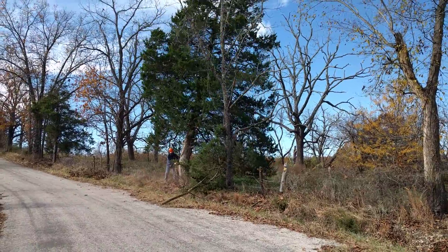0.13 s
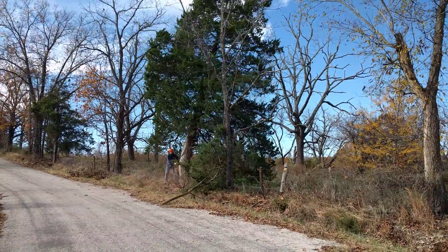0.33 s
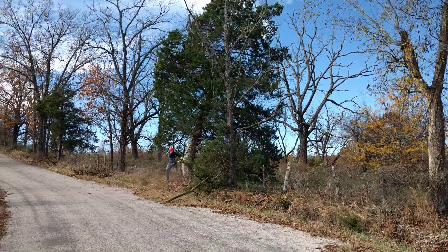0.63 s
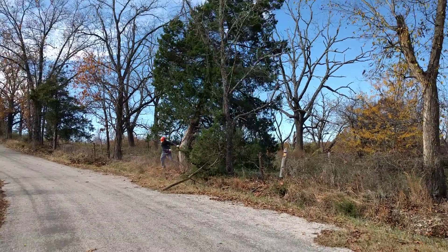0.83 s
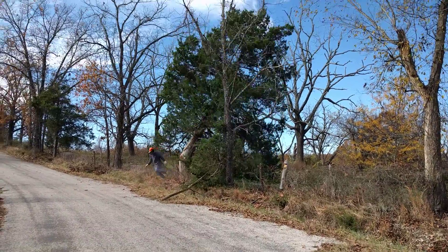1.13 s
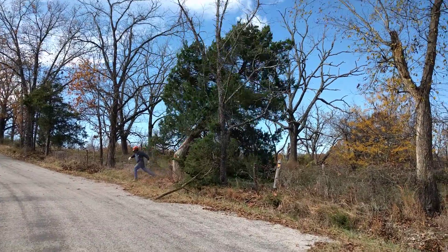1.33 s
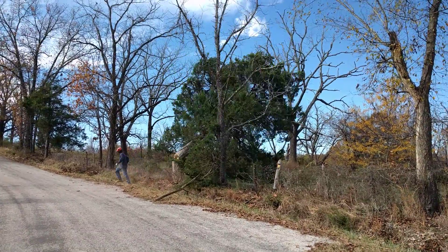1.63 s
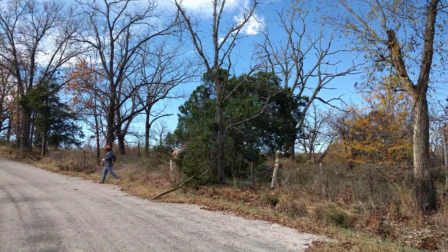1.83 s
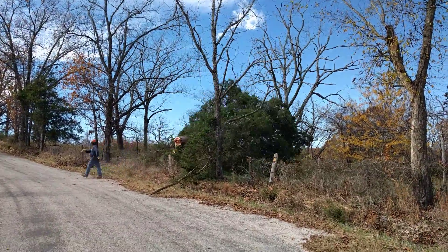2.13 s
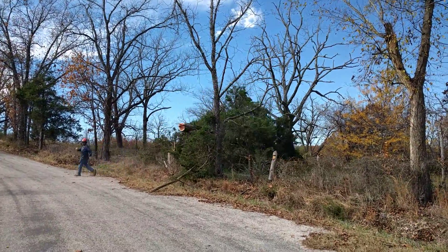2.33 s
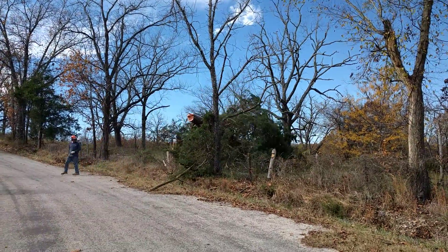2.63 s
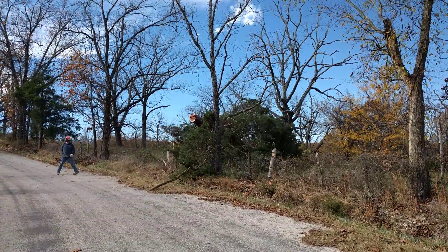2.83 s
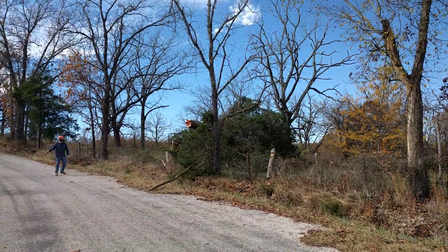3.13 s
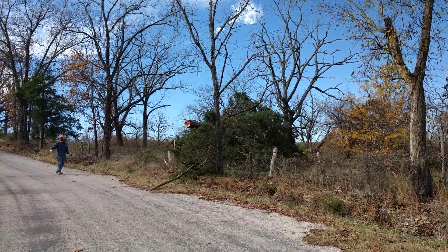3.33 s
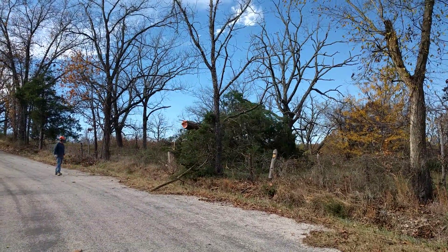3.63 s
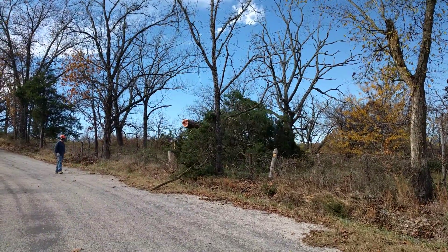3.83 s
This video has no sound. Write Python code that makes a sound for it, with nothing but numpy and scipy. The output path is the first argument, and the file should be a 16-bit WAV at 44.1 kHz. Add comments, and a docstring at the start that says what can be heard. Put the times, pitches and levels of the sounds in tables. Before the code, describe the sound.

A tree falls outdoors: a buzzing chainsaw runs down as loud cracks burst out, the hinge creaks and groans, then branches swish and snap, dull thuds follow, and a faint idle putters; microphone at some distance.

```python
"""Felling an evergreen

A chainsaw runs down to idle: exhaust pulses through a muffler. Hinge wood cracks (noise bursts),
creaks (jerky slips ringing fibres) and groans (regular slips through resonances).
Foliage swishes (noise), twigs snap, limbs thud (decaying sines) over a rumble.
The surrounding woods answer with scattered echoes, in faint outdoor air."""
import sys
import numpy as np
from scipy import signal
from scipy.fft import rfft, irfft, next_fast_len
from scipy.io import wavfile

SR = 44100
rng = np.random.default_rng(int(sys.argv[2]) if len(sys.argv) > 2 else 0)


def wrap_up_sound(samples):
    """Save the sound to the file named by the first command line argument, as 16-bit audio."""
    columns = np.atleast_2d(samples).T
    # keep every value between -1 and 1, then stretch to whole-number steps
    tamed = np.clip(columns, -1, 1)
    steps = np.round(tamed * 32767).astype(np.int16)
    wavfile.write(sys.argv[1], SR, steps)


N = 176400  # samples


def amp(db):
    """Decibels to gain."""
    return 10 ** (np.asarray(db) / 20)


def unit(x):
    """Scale to rms 1."""
    return x / np.sqrt(np.mean(x ** 2) + 1e-20)


def along(points, hz):
    """Read (frequency [Hz], value) points on a log-frequency axis."""
    f, v = np.transpose(points)
    return np.interp(np.log(hz + 1), np.log(f + 1), v)


def curves(rows):
    """One value per sample for each column after the time."""
    s, *cols = np.transpose(rows)
    return [np.interp(np.arange(N) / SR, s, c) for c in cols]


def fade(t, t60_s):
    """Exponential decay, 60 dB in t60_s."""
    return np.exp(-np.log(1000) * t / t60_s)


def attack(t, rise_s):
    """Exponential onset with time constant rise_s."""
    return 1 - np.exp(-t / rise_s)


def add(track, s, sound):
    """Mix a sound into a track at time s."""
    part = track[max(round(s * SR), 0):][:len(sound)]
    part += sound[:len(part)]


def body(x, points):
    """Filter x by a minimum-phase body: relative response from the points, impulse energy 1."""
    size = 8192
    log_gain = np.log(amp(along(points, np.fft.rfftfreq(size, 1 / SR))))
    # folding the cepstrum makes the response causal
    cepstrum = irfft(log_gain)
    cepstrum[1:size // 2] *= 2
    cepstrum[size // 2 + 1:] = 0
    ring = irfft(np.exp(rfft(cepstrum)))
    return signal.fftconvolve(x, ring / np.linalg.norm(ring))[:N]


def noise(points):
    """Coloured noise of rms 1."""
    return unit(body(rng.standard_normal(N), points))


def beats(rows, jitter_s, scatter_db):
    """Times and strengths of a train at the rate in the second column, lasting as long as the rows."""
    rate, t = curves(rows)[0], np.arange(N) / SR
    turns = np.cumsum(rate) / SR
    when = np.interp(np.arange(1, turns[-1]), turns, t)
    when = when[(when > rows[0][0]) & (when < rows[-1][0])]
    chance = rng.standard_normal((len(when), 2))
    strength = unit(amp(scatter_db * chance[:, 0]))
    # sparser pulses are stronger, so the train stays near rms 1
    strength = strength * np.sqrt(SR / np.interp(when, t, rate))
    return when + jitter_s * chance[:, 1], strength


def pulses(rows, jitter_s, scatter_db):
    """A sharp pulse on every beat, about rms 1, placed between samples by a windowed sinc."""
    when, strength = beats(rows, jitter_s, scatter_db)
    at = when[:, None] * SR
    taps = np.floor(at).astype(int) + np.arange(-7, 9)
    shape = np.sinc(taps - at) * np.cos(np.pi * (taps - at) / 16) ** 2
    weights = strength[:, None] * shape
    return np.bincount(np.clip(taps, 0, N).ravel(), weights.ravel(), N + 1)[:N]


# radiation of breaking wood: (frequency [Hz], level [dB])
WOOD = [(40, -15), (150, 10.5), (400, 0.5), (600, 0), (2200, 4.5), (3100, -10), (4000, 1.5), (5300, -5),
        (6600, -21), (9500, -14.5), (15000, -44)]
CRACK_ATTACK_S, CRACK_OCTAVES = .0002, 0.78
CRACK_SKIRT_DB, CRACK_GRAIN_DB = -20.5, 5


def snap(centre_hz, t60_s, size):
    """One fracture: a fast-dying burst around the wood piece's pitch, with random resonances."""
    t, hz = np.arange(size) / SR, np.fft.rfftfreq(size, 1 / SR)
    octaves = np.log2((hz + 1) / centre_hz)
    knots = np.linspace(-5, 3, 48)
    grain = amp(CRACK_GRAIN_DB * np.interp(octaves, knots, rng.standard_normal(len(knots))))
    hump = np.exp(-.5 * (octaves / CRACK_OCTAVES) ** 2) + amp(CRACK_SKIRT_DB)
    colour = hump * amp(along(WOOD, hz)) * grain
    burst = unit(irfft(colour * np.exp(2j * np.pi * rng.random(len(hz)))))
    return burst * fade(t, t60_s) * attack(t, CRACK_ATTACK_S)


# breaking wood: (time [s], strength [dB], centre [Hz], t60 [s])
CRACKS = [(0.4671, -10, 2040, 0.023), (0.571, -15, 2150, 0.027), (.598, 1.5, 2000, 0.031),
          (0.64, -16, 2310, 0.017), (0.7495, -2.5, 1840, 0.029), (0.765, 0.5, 1530, 0.014),
          (0.827, -15.5, 1600, 0.058), (.833, 8.5, 1090, 0.027), (.876, -13.5, 1510, 0.014),
          (0.884, -10, 1450, 0.021), (0.9003, 2.5, 1765, 0.023), (0.9407, -7, 1390, .014),
          (.964, -4.5, 1400, 0.011), (1.162, -8, 3560, 0.012), (1.329, -12, 3770, 0.015),
          (1.394, -5.5, 3617, 0.011), (1.427, -14, 3740, 0.015), (1.584, -9.5, 2710, 0.04),
          (1.618, -17, 3420, 0.02), (1.652, -17, 2377, 0.029), (1.7371, -5.5, 2630, 0.03),
          (1.793, -3, 3465, 0.022), (1.81, -8.5, 3300, 0.024), (1.831, -4, 1360, 0.057),
          (1.886, -14.5, 2220, 0.096), (1.895, -10.5, 1960, 0.023), (1.9505, -12, 2860, 0.035),
          (2.002, -8, 2130, 0.018), (2.01, -11, 2430, 0.16), (2.038, -2, 3260, 0.016),
          (2.05, -10, 2440, 0.038), (2.081, -13, 3040, 0.023), (2.1086, -11.5, 2800, 0.016),
          (2.162, -17, 1860, 0.13), (2.189, -6, 1760, 0.041), (2.215, -13.5, 2260, 0.043),
          (2.2385, -3.5, 1750, 0.015), (2.249, -9, 1980, 0.11), (2.283, -13, 3000, 0.039),
          (2.332, -9, 2430, 0.043), (2.352, -14.5, 2600, 0.056), (2.425, -12, 2280, 0.032),
          (2.495, -23, 1810, 0.044), (2.548, -11.5, 1630, 0.023), (2.704, -11, 3520, 0.0046),
          (2.745, -18, 2560, 0.015), (2.848, -23, 2420, 0.069), (2.938, -24, 3020, 0.052),
          (3.096, -19, 2240, 0.027), (3.11, -24.5, 2160, .05), (3.128, -21, 3000, 0.044),
          (3.159, -25, 2120, 0.028), (3.314, -35.5, 2050, 0.032), (3.612, -49, 5930, 0.019)]
# sharp tick of each crack: (frequency [Hz], level [dB])
TICK = [(300, -18.5), (2000, 4), (4500, 14.5), (6500, -11), (10000, -13.5), (12000, -28), (16000, -21.5)]
TICK_DB, TICK_T60_S = -6, .0045
# heavy wood resounding as it breaks: (time [s], level [dB])
KNOCKS = [(0.603, -7), (0.767, -10.5), (0.836, 0), (0.904, -5), (1.831, -10), (1.894, -20), (2.187, -14.5),
          (2.251, -20), (2.355, -27.5), (2.529, -25), (2.546, -23.5)]
# resonance of the heavy wood: (frequency [Hz], level [dB])
TRUNK = [(50, -32.5), (110, -13), (230, 6), (380, -10), (540, 5.5), (850, 2.5), (1300, -12.5), (2500, -27),
         (8000, -59)]
KNOCK_T60_S, KNOCK_ATTACK_S = 0.056, .001


def cracks():
    """Hinge, then big branches, break: a sharp tick and a burst; heavy pieces also knock."""
    out, t = np.zeros(N), np.arange(8192) / SR
    ticks, trunk = noise(TICK), noise(TRUNK)
    for s, db, hz, t60_s in CRACKS:
        tick = ticks[round(s * SR):][:len(t)] * fade(t, TICK_T60_S)
        add(out, s, amp(db) * (snap(hz, t60_s, size=8192) + amp(TICK_DB) * tick))
    for s, db in KNOCKS:
        knock = trunk[round(s * SR):][:len(t)] * fade(t, KNOCK_T60_S) * attack(t, KNOCK_ATTACK_S)
        add(out, s, amp(db) * knock)
    return out


# hinge fibres popping one after another: (time [s], level [dB])
FIBRES = [(0, -38), (.4, -30), (.58, -23), (.7, -24), (.88, -24.5), (.95, -30), (1.1, -49)]
FIBRES_PER_S, FIBRE_HZ, FIBRE_T60_S, FIBRE_SCATTER_DB = 85, 1640, 0.022, 3.8  # Hz: median pitch


def fibres():
    """Strained fibres let go in an uneven run of small pops."""
    out = np.zeros(N)
    end_s = FIBRES[-1][0]
    for k, (late, pitch, size) in enumerate(rng.standard_normal((160, 3))):
        s = (k + .3 * late) / FIBRES_PER_S
        if s < end_s:
            pop = snap(FIBRE_HZ * np.exp(.15 * pitch), FIBRE_T60_S, size=1024)
            add(out, s, amp(FIBRE_SCATTER_DB * size) * pop)
    run = unit(out) * np.sqrt(end_s * SR / N)  # about rms 1 over the run alone
    return amp(curves(FIBRES)[0]) * run


# jerky hinge: (time [s], slips per second [1/s], level [dB], ring pitch [Hz])
CREAK = [(0.899, 127, -21, 1360), (.925, 140, -14.5, 1330), (.952, 140, -10.5, 1335), (.98, 185, -16, 1480),
         (1.02, 205, -15, 1480), (1.09, 210, -16.5, 1470), (1.15, 240, -18, 1450), (1.2, 285, -24.5, 1540),
         (1.25, 340, -34.5, 1560)]
# fibres rung by each jerk: (multiple of ring pitch [ratio], level [dB], t60 [s])
CREAK_MODES = [(.82, -4, .014), (1, 0, .016), (1.3, -2, .013), (2.75, -15, .008)]
# trunk radiation of the rings: (frequency [Hz], level [dB])
CREAK_BAND = [(300, -18.5), (800, -5), (1200, -1), (2050, -1.5), (2700, -11.5), (4200, -2.5), (6500, -25.5)]
# trunk shaken by the jerks: (frequency [Hz], level [dB])
CREAK_BASS = [(80, -22.5), (195, 7.5), (330, -21), (600, -12.5), (1500, -53)]
CREAK_BASS_DB = -12
CREAK_JITTER_S, CREAK_SCATTER_DB, CREAK_PITCH_SCATTER = .00028, 2.2, .06  # pitch: log ratio


def creak():
    """The hinge sticks and slips; each jerk rings fibres at a slightly new pitch and shakes the trunk."""
    _, level_db, ring_hz = curves(CREAK)
    rings, pushes, t = np.zeros(N), np.zeros(N), np.arange(1024) / SR
    ratio, db, t60_s = np.transpose(CREAK_MODES)[:, :, None]
    detune = np.exp(CREAK_PITCH_SCATTER * rng.standard_normal((128, len(ratio), 1)))
    for s, strength, shift in zip(*beats(CREAK, CREAK_JITTER_S, CREAK_SCATTER_DB), detune):
        hz = ring_hz[round(s * SR)] * ratio * shift
        modes = amp(db) * np.sin(2 * np.pi * hz * t) * fade(t, t60_s)
        ring = body(modes.sum(0), CREAK_BAND)
        add(rings, s, strength * ring / np.linalg.norm(ring))
        add(pushes, s, np.array([strength]))
    return amp(level_db) * (rings + amp(CREAK_BASS_DB) * body(pushes, CREAK_BASS))


# smooth hinge: (time [s], slips per second [1/s], bass level [dB], hollow middle level [dB],
# ring level [dB], bright edge level [dB])
GROAN = [(1.1, 150, -37, -41.5, -37, -36), (1.17, 142, -25, -22, -29, -30),
         (1.193, 175, -25, -29, -20, -18), (1.228, 172.6, -31.5, -24, -26.5, -24.5),
         (1.323, 193, -26.5, -26, -21, -23.5), (1.39, 195.5, -29.5, -30.5, -23, -26),
         (1.44, 199, -29.5, -34, -28, -37), (1.472, 197.5, -27.5, -35.5, -27.5, -33),
         (1.507, 194.6, -32.5, -29.5, -37.5, -38.5), (1.59, 206, -34, -32.5, -43.5, -39),
         (1.66, 235, -31, -45, -46, -45.5), (1.69, 270, -36.5, -41, -55, -57),
         (1.76, 216, -45, -63.5, -65, -65)]
# resonances of the groan, each: (frequency [Hz], level [dB])
GROAN_BASS = [(70, -25.5), (190, 5.5), (300, -1.5), (400, -5.5), (500, 1.5), (600, -3), (780, -34),
              (1200, -40.5), (3000, -58.5)]
GROAN_MIDDLE = [(300, -39), (650, -17.5), (790, -16.5), (900, -1.5), (1020, -2.5), (1180, -11), (2000, -38),
                (6000, -65)]
GROAN_RING = [(300, -49.5), (950, -23), (1170, -0.5), (1260, -2.5), (1390, 4), (1520, -4.5), (1800, -26),
              (3000, -45), (15000, -78)]
GROAN_EDGE = [(300, -39.5), (1350, -12.5), (1560, 4.5), (1780, 1.5), (2000, -8), (2400, -10.5),
              (3100, -30.5), (4000, -13), (6500, -64), (15000, -85.5)]
GROAN_JITTER_S, GROAN_SCATTER_DB = .00001, .8


def groan():
    """Regular slips: a smooth, mostly rising groan whose upper resonances fade before its bass."""
    slips = pulses(GROAN, GROAN_JITTER_S, GROAN_SCATTER_DB)
    parts = (GROAN_BASS, GROAN_MIDDLE, GROAN_RING, GROAN_EDGE)
    return sum(body(slips * amp(db), part) for db, part in zip(curves(GROAN)[1:], parts))


# crown: (time [s], swishing foliage level [dB], snapping twigs level [dB])
CROWN = [(0, -24.5, -56), (.45, -29, -54), (.62, -25.5, -44), (.8, -28.5, -51), (.92, -32, -27.5),
         (1.1, -34, -40), (1.5, -36.5, -34), (1.68, -31, -32), (1.85, -26, -21), (2.05, -23.5, -31.5),
         (2.15, -28, -26), (2.27, -27, -31.5), (2.45, -31, -28.5), (2.63, -38, -39), (2.9, -42, -42.5),
         (3.15, -48, -45), (3.35, -51, -49), (3.5, -58, -64.5), (4, -64.5, -66.5)]
# foliage colour: (frequency [Hz], level [dB])
FOLIAGE = [(50, -23), (200, 0.5), (380, -12.5), (600, -1.5), (1200, -1.5), (2000, 1), (3100, -4),
           (4100, -1), (5400, -8), (6600, -24), (9500, -25), (12000, -44), (16000, -36)]
TWIGS_PER_S, TWIG_SPREAD_DB, TWIG_T60_S = 620, 7, 0.014


def crown(count=24):
    """Foliage swishes while twigs of many sizes snap at random."""
    foliage_db, twig_db = curves(CROWN)
    twigs = np.zeros(N)
    for hz in np.geomspace(1200, 4600, count):
        struck = rng.random(N) < TWIGS_PER_S / count / SR
        strength = amp(TWIG_SPREAD_DB * np.minimum(rng.standard_normal(N), 2))
        twigs += signal.oaconvolve(struck * strength, snap(hz, TWIG_T60_S, size=1024))[:N]
    return amp(foliage_db) * noise(FOLIAGE) + amp(twig_db) * unit(twigs)


# trunk and limbs striking the ground: (time [s], level [dB])
THUDS = [(0.6, -23), (0.839, -20), (0.901, -25), (1.237, -30), (1.389, -29), (2.252, -40), (2.803, -20.5),
         (2.9, -23.5), (2.995, -29.5), (3.156, -27), (3.326, -24.5)]
THUD_MIDDLE_HZ, THUD_T60_S, THUD_ATTACK_S = 110, 0.086, 0.0042
# rumble: (time [s], level [dB])
RUMBLE_LEVEL = [(0, -47), (.7, -43), (1, -29.5), (1.6, -48), (1.9, -46), (2.5, -40), (2.85, -39),
                (3.2, -44.5), (3.45, -46), (3.65, -52.5), (3.8, -60), (4, -55)]
# rumble colour: (frequency [Hz], level [dB])
RUMBLE = [(20, -18), (40, -34), (65, 1), (120, 4), (260, -2), (400, -11), (900, -43), (3000, -45)]
# bass roll-off of the ground sounds: (frequency [Hz], level [dB])
BASS_CUT = [(20, -23.5), (40, -15), (70, 1.5), (20000, 1)]


def ground():
    """Dull thuds of trunk and limbs, three detuned decaying modes each, over a low rumble."""
    out = amp(curves(RUMBLE_LEVEL)[0]) * noise(RUMBLE)
    t = np.arange(SR // 4) / SR
    for s, db in THUDS:
        detune = np.exp(0.13 * rng.standard_normal((3, 1)))
        hz = THUD_MIDDLE_HZ * np.array([[.68], [1], [1.55]]) * detune
        thud = np.sin(2 * np.pi * hz * t).sum(0) * fade(t, THUD_T60_S) * attack(t, THUD_ATTACK_S)
        add(out, s, amp(db) * thud)
    return body(out, BASS_CUT)


# saw engine: (time [s], firings per second [1/s], exhaust hum level [dB], bark level [dB])
SAW = [(0, 181.8, -26, -23), (.118, 179.1, -26, -22), (.226, 174.2, -27, -23), (.396, 171.8, -27, -23),
       (.462, 173, -23, -21), (.496, 168.4, -24, -23), (.512, 165, -24.5, -20.5), (.58, 179, -25.5, -25),
       (.63, 181, -27.5, -20), (.7, 168, -30, -24), (.76, 156, -31, -29), (.92, 124, -32.5, -33),
       (1.05, 101.5, -29.5, -27), (1.2, 93, -34.5, -39), (2.4, 55, -66, -65.5)]
# exhaust hum: (frequency [Hz], level [dB])
HUM = [(90, -24), (170, 2), (260, 2.5), (350, -7.5), (440, -11), (530, 2), (700, -9.5), (880, -20.5),
       (1300, -25.5), (4000, -58)]
# muffler bark: (frequency [Hz], level [dB])
MUFFLER = [(200, -27.5), (800, -13.5), (1060, 6.5), (1250, 7.5), (1550, 5), (1750, -6.5), (1920, 5),
           (2100, -14), (2350, 4), (2850, 2), (3200, -31), (3650, -11.5), (4000, -2), (5100, -23),
           (6500, -35), (15000, -61)]
# rasp colour: (frequency [Hz], level [dB])
RASP = [(100, -26), (500, -4), (1300, 22), (2400, -13), (3200, -16.5), (4200, -5), (5300, -10.5),
        (6500, -25), (9500, -29.5), (11500, -43.5), (16000, -47.5)]
SAW_JITTER_S, SAW_SCATTER_DB = .000005, 1.1
SAW_RASP_DB, RASP_DROP_DB = -12, 24  # re bark; fall within each firing
# idling saw: (time [s], firings per second [1/s], level [dB])
IDLE = [(2.3, 46, -59), (3.1, 51.4, -47.5), (3.5, 45.5, -52.5), (3.75, 43.4, -54), (4, 42.4, -51.5)]
# idle putter: (frequency [Hz], level [dB])
PUTTER = [(60, -13), (170, 0), (300, 3), (400, -4), (600, 4), (800, -17), (2000, -37.5), (5000, -40),
          (9000, -54.5)]
IDLE_JITTER_S, IDLE_SCATTER_DB = .0005, 2


def chainsaw():
    """Exhaust pulses hum and bark through the muffler, a rasp beats at their rate; then idle putters."""
    rate, hum_db, bark_db = curves(SAW)
    firings = pulses(SAW, SAW_JITTER_S, SAW_SCATTER_DB)
    cycle = np.cumsum(rate) / SR % 1
    rasp = unit(noise(RASP) * amp(-RASP_DROP_DB * cycle))
    hum = amp(hum_db) * body(firings, HUM)
    bark = amp(bark_db) * (body(firings, MUFFLER) + amp(SAW_RASP_DB) * rasp)
    putter = body(pulses(IDLE, IDLE_JITTER_S, IDLE_SCATTER_DB), PUTTER)
    return hum + bark + amp(curves(IDLE)[1]) * putter


# what a trunk throws back: (frequency [Hz], level [dB])
SCATTER = [(200, -30.5), (600, 8), (1200, -1), (5000, -4), (16000, -4.5)]
TRUNKS_SPREAD_S, TRUNKS_DB = .016, -13


def trunks(x, count=10):
    """Nearby trunks return weak early copies that blur each pulse; the bass passes around them."""
    delays = (TRUNKS_SPREAD_S * SR * rng.uniform(.1, 1, count)).astype(int)
    signs = rng.choice([-1, 1], count)
    copies = sum(sign * np.pad(x, (d, 0))[:N] for d, sign in zip(delays, signs))
    return x + amp(TRUNKS_DB) * body(copies, SCATTER) / np.sqrt(count)


# echo decay: (frequency [Hz], t60 [s])
WOODS_T60 = [(100, 0.62), (1500, 0.61), (5000, 0.2), (14000, 0.05)]


def woods(x):
    """Scattered echoes from the surrounding trees: a noise tail whose treble dies first."""
    hz, t, z = signal.stft(rng.standard_normal(SR), SR, nperseg=256)
    decay = fade(t, along(WOODS_T60, hz)[:, None])
    tail = signal.istft(z * decay, SR, nperseg=256)[1]
    late = np.pad(tail, (SR // 200, 0))  # 5 ms delay
    return signal.fftconvolve(x, late / np.linalg.norm(tail))[:N]


# still outdoor air: (frequency [Hz], level [dB])
AIR = [(20, -12.5), (80, -3.5), (200, -9), (500, -16.5), (2000, -24), (4000, -34), (7000, -37),
       (16000, -55.5)]
AIR_DB = -59.5


def air():
    """Faint steady noise of still outdoor air."""
    return amp(AIR_DB) * noise(AIR)


TONE_WOODS_DB, WOODS_DB = -18, -16  # echo sends: saw, creak and groan; breaking wood and crown


def scene():
    """Tree, ground and saw with echoes from the woods, in faint outdoor air."""
    breaking = fibres() + cracks() + crown()
    tones = chainsaw() + trunks(creak() + groan())
    echoes = woods(amp(TONE_WOODS_DB) * tones + amp(WOODS_DB) * breaking)
    return (tones + breaking + echoes + ground() + air())[None]


OVERLOAD, TOP_HZ = 0.71, 16000  # ceiling [full scale]; band limit


def record(dry):
    """The loudest cracks overload the microphone; nothing is kept above the band limit."""
    clipped = dry / (1 + np.abs(dry / OVERLOAD) ** 8) ** (1 / 8)
    m = next_fast_len(N + SR // 2)
    kept = np.fft.rfftfreq(m, 1 / SR) < TOP_HZ
    return irfft(rfft(clipped, m) * kept, m)[..., :N]


dry = scene()
out = record(dry)
wrap_up_sound(out)
```